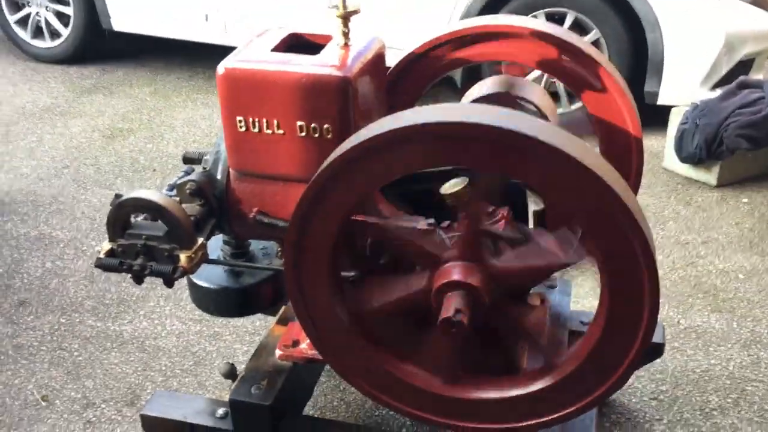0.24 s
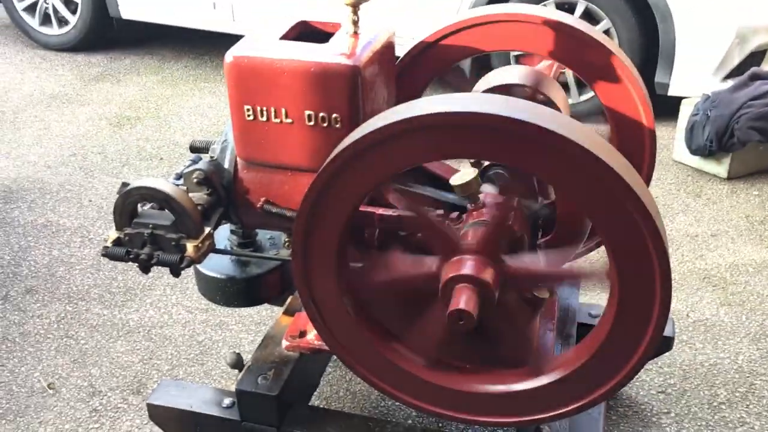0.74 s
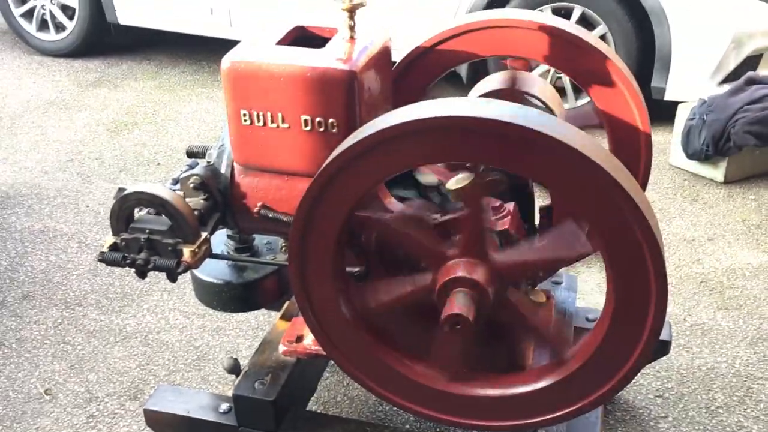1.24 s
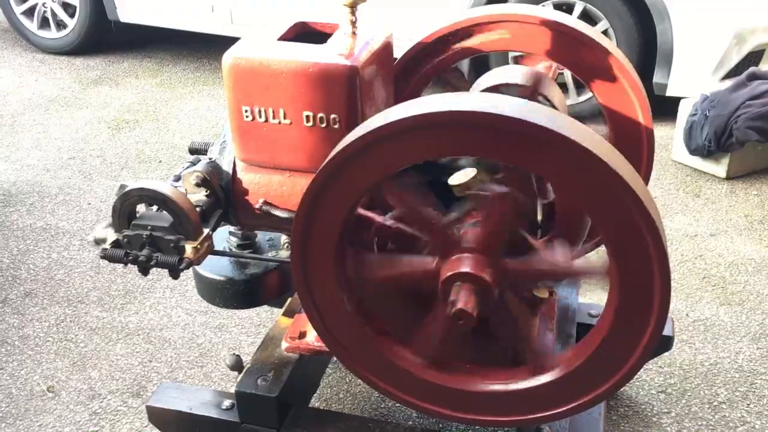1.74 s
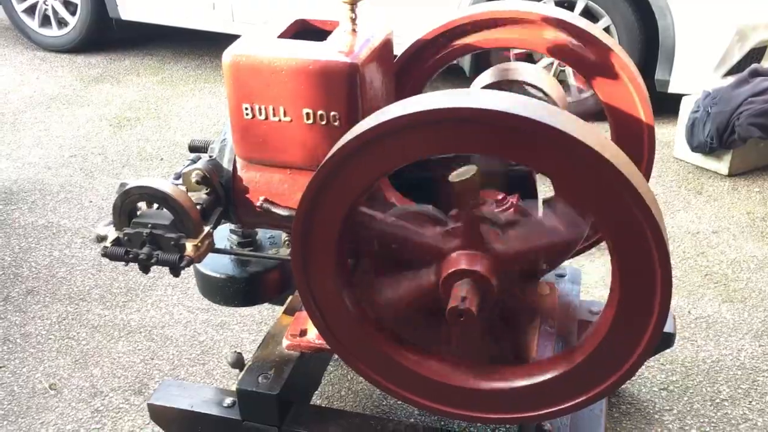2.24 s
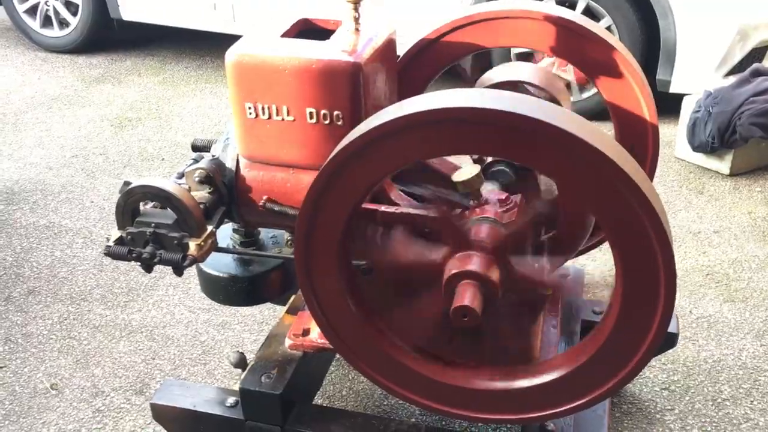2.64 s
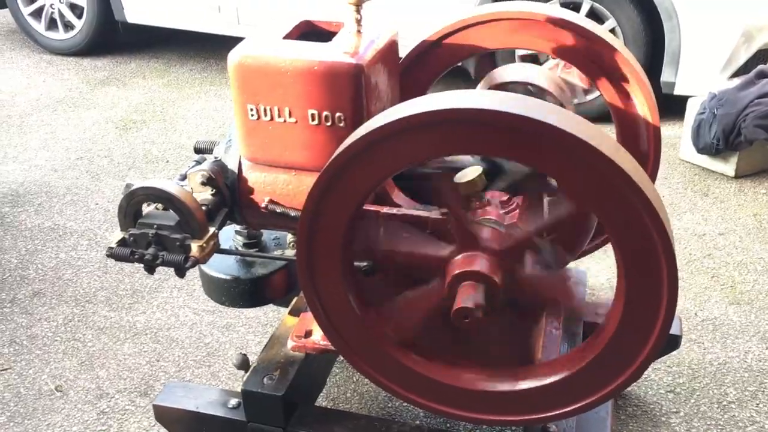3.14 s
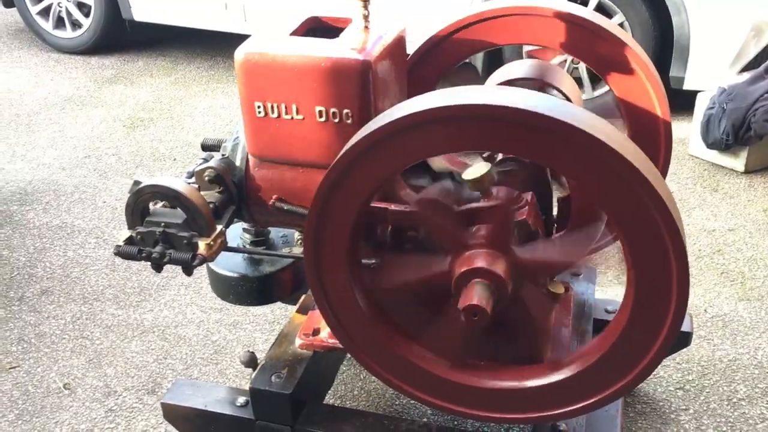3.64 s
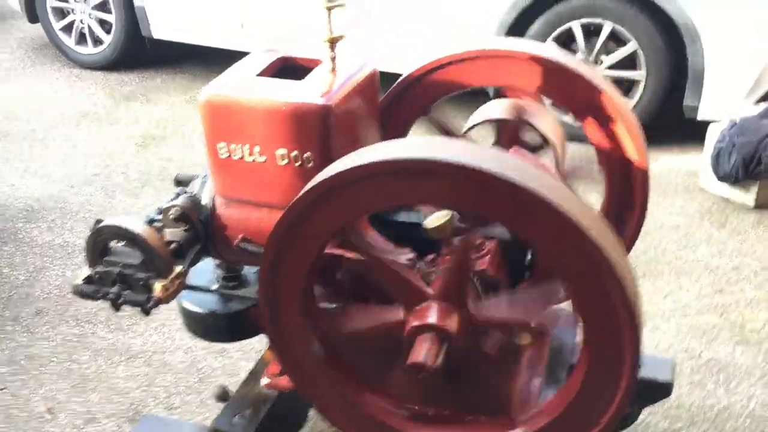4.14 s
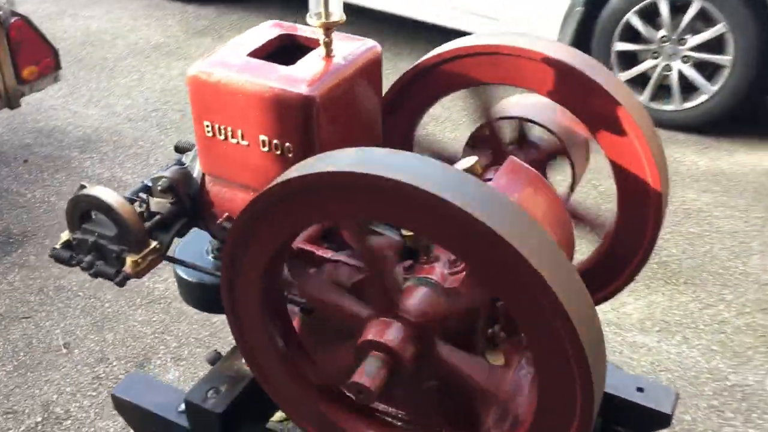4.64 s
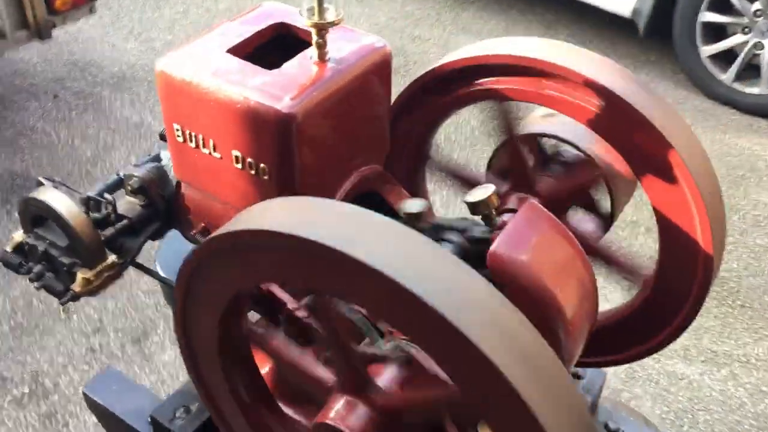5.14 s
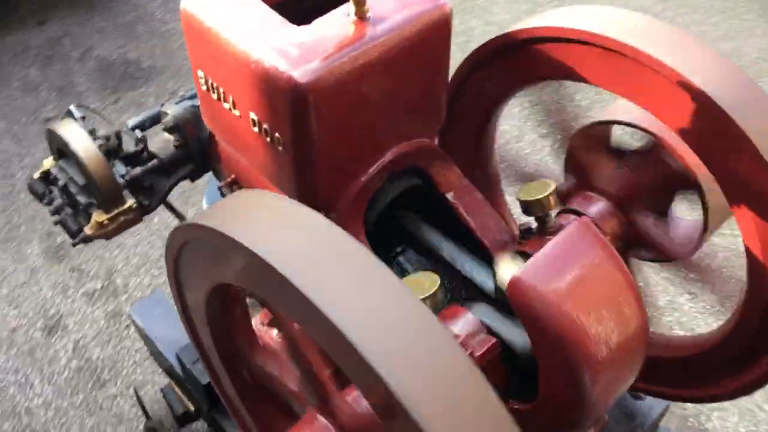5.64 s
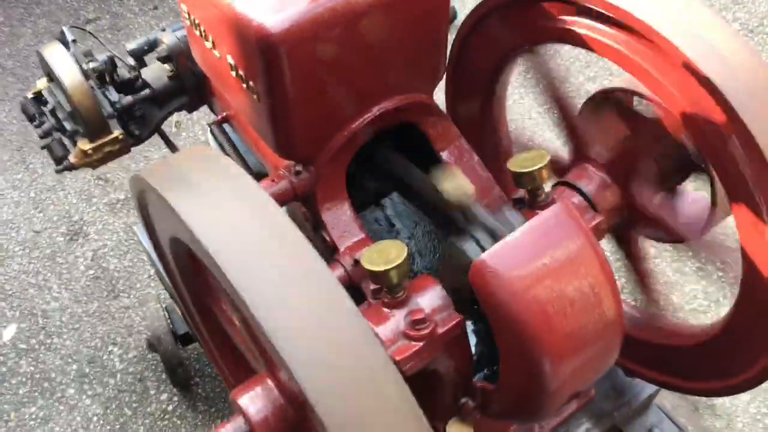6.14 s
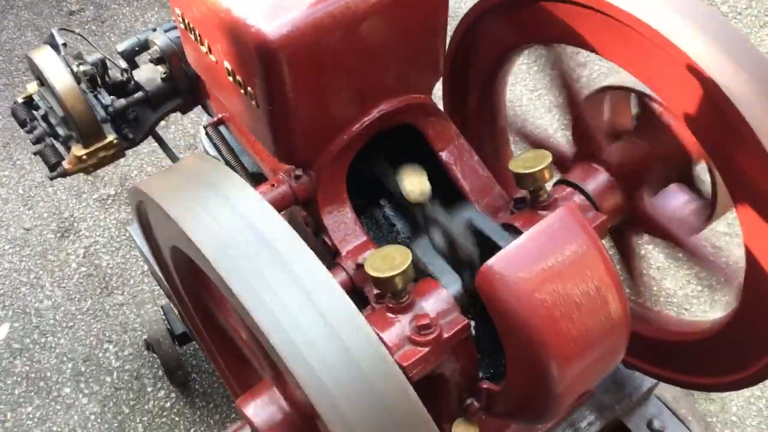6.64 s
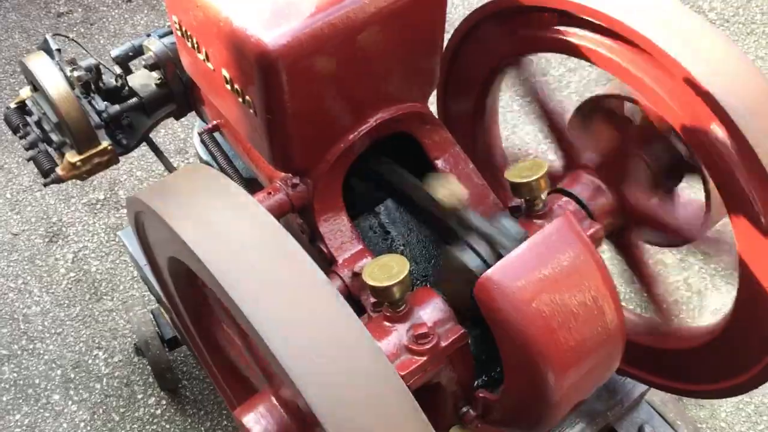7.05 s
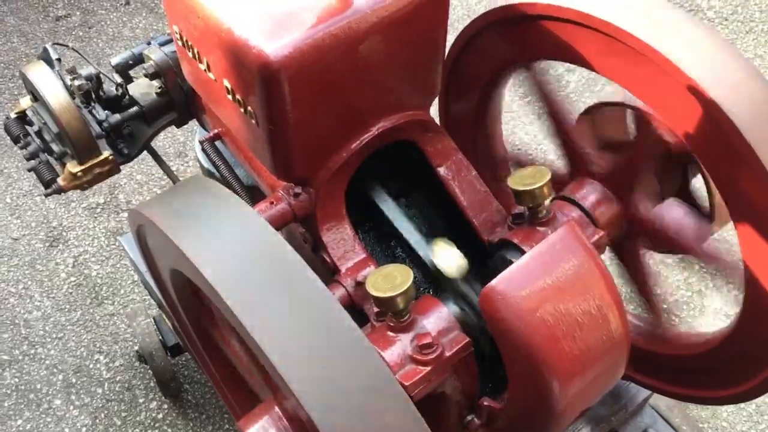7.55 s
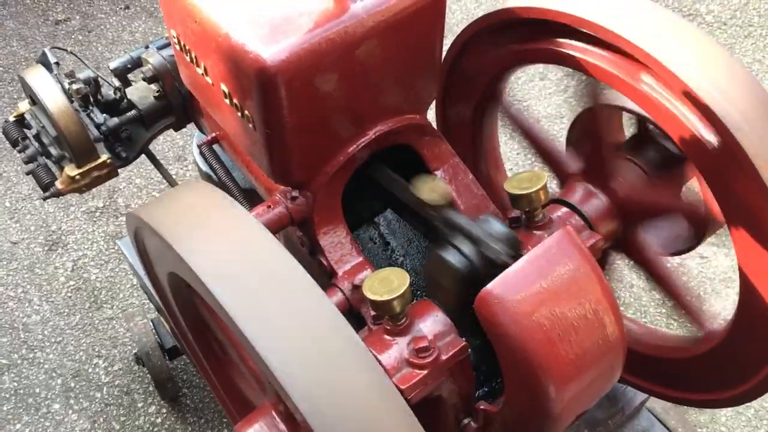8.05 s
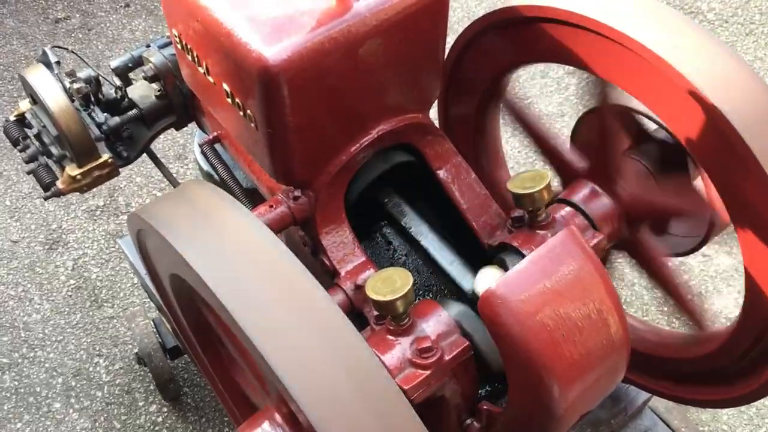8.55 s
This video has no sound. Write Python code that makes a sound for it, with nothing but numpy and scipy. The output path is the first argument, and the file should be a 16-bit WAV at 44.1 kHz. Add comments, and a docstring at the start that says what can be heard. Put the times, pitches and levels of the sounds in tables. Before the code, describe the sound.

An old stationary engine runs outdoors with an even clatter, about three ringing iron knocks a second, mixed with light clicks and rhythmic rubbing. It slows, snorts in air and fires with a hiss and an exhaust bark, then picks up speed. It slows and fires once more, then coasts on. Wind rumbles on the microphone, mostly early, and the engine sounds slightly closer in the second half.

```python
"""Hit-and-miss engine outdoors

A stationary engine coasts at about three turns a second, slowing until it fires, twice. Each turn the
piston rubs and the slack crank knocks the iron frame into ringing; cam and igniter trip click in turn.
A firing is an intake snort, gas hissing past the piston, the igniter's snap and an exhaust bark.
Wind buffets the microphone, which moves in close over the crank halfway through."""
import sys
import numpy as np
from scipy import signal
from scipy.fft import rfft, irfft, next_fast_len
from scipy.io import wavfile
from scipy.ndimage import uniform_filter1d, map_coordinates

SR = 44100
rng = np.random.default_rng(int(sys.argv[2]) if len(sys.argv) > 2 else 0)


def output_pcm(signal):
    """Save a mono or channel-first signal as 16-bit PCM at the path in sys.argv[1].

    Samples are clipped to [-1, 1] before scaling.
    """
    pcm = np.clip(np.atleast_2d(signal).T, -1, 1) * 32767
    wavfile.write(sys.argv[1], SR, np.round(pcm).astype(np.int16))


N = 388080
TIME = np.arange(N) / SR
USUAL_TURN_S = 0.34
COAST_MIN_S, COAST_MAX_S = 0.25, 0.5  # a power turn is shorter, a compression turn longer

# the knock that ends each turn: start_s, level_db, hardness_db, valve_gear_db
CRANK_KNOCKS = [(0.2075, -5, 8, 1), (0.5596, -11.5, 7, 0), (0.9369, -6.5, 5, 0.5), (1.3209, -12.5, 7.5, -6),
                (1.7432, -12.5, 11, -1), (2.332, -2, -2, 0), (2.5205, -3, 4, 0), (2.801, -2.5, 4.5, -2),
                (3.0984, 0, 3.5, 4.5), (3.4001, -5, 5, 2.5), (3.7218, -1.5, 3, 4), (4.0454, -9, 2.5, -1),
                (4.3959, -5.5, 7, -0.5), (4.7487, -11.5, 5, -1), (5.1357, -14.5, 8.5, 2),
                (5.671, -6, 5.5, 0), (5.854, -3.5, 4.5, 0), (6.13, -5, 8, 0.5), (6.4222, -3, 8, 2),
                (6.7153, -6, 5, 1), (7.0292, -2.5, 4.5, 0.5), (7.346, -8, 5.5, 1.5), (7.6861, -5.5, 8, 2.5),
                (8.0316, -13, 6.5, 0.5), (8.4016, -7.5, 11, -0.5), (8.7789, -15.5, 8.5, 0.5)]
# firings: intake_opens_s, intake_shuts_s, air_db, flutter_db, pressure_peak_s, leak_db,
# exhaust_opens_s, spurt_hz, bark_db
FIRING_CYCLES = [(1.85, 1.998, -25.5, -39, 2.279, -9.5, 2.439, 217.8, -12),
                 (5.235, 5.368, -23, -22.5, 5.64, -7.5, 5.776, 191, -10)]
# modes of frame and flywheels, light steel parts, loose iron parts: pitch_hz, level_db, t60_s
FRAME_MODES = [(1060, -31.5, 0.15), (1258, -15, 0.34), (1407, -17, .2), (1459, -8, 0.11),
               (1780, -13.5, 0.19), (2320, 1.5, .17), (2380, -10.5, 0.24), (2483, -8, 0.11),
               (2640, -10, 0.14), (2726, 5, 0.12), (2740, -2, 0.044), (2992, 4, 0.092), (3210, -9.5, 0.17),
               (3417, -10, 0.16), (3535, -9.5, 0.18), (3720, -34, .09), (3780, -3.5, 0.088),
               (4170, -7, 0.073), (4360, -10, 0.078), (4680, -10, 0.11), (4600, -32, .17),
               (5230, -7.5, .13), (5900, -12, 0.079), (5590, -19, 0.11), (6050, -49, .15)]
STEEL_MODES = [(4540, -9, 0.15), (5795, 1.5, 0.038), (6550, -6, .07), (7290, -4, 0.087),
               (8330, -7.5, 0.052), (8920, 6.5, 0.014), (9650, 0, 0.04), (10290, -0.5, 0.042),
               (11650, -2.5, 0.047), (12260, -3.5, 0.067), (13600, -5, 0.046), (14100, -4, 0.059)]
LOOSE_MODES = [(664, -8.5, 0.1), (905, -5.5, 0.062), (1144, -12.5, .09), (1261, -2.5, 0.2),
               (1378, -6.5, 0.061), (1473, -1, 0.07), (1680, 1.5, 0.045), (1810, 1.5, 0.061),
               (1947, 2.5, .06), (2193, -0.5, .06), (2110, -7, 0.07), (2536, 5.5, 0.075),
               (2770, -3.5, 0.07), (2997, 2, 0.035), (3416, -5, .06), (3940, -1.5, 0.05)]
# microphone's approach to the crank: time_s, closeness (0 to 1)
MIC_PATH = [(0, 0.07), (4.6, 0), (6, 1), (8.8, 0.91)]


def amp(db):
    """Decibels to amplitude ratio."""
    return 10 ** (np.asarray(db) / 20)


def unit(x):
    """Normalisation to rms 1."""
    return x / np.sqrt(np.mean(x ** 2))


def add(out, start_s, x):
    """Superposition of x on out from start_s."""
    i = int(start_s * SR)
    x, i = x[max(-i, 0):], max(i, 0)
    out[i:i + len(x)] += x[:max(len(out) - i, 0)]


def decay(t, t60):
    """Exponential damping by 60 dB in t60."""
    return np.exp(-np.log(1000) * t / t60)


def swell(x, start, end, rise_db, fall_db):
    """Exponential attack and release around a hold from start to end; slopes in dB per unit of x."""
    return amp(-rise_db * np.maximum(start - x, 0) - fall_db * np.maximum(x - end, 0))


def walk(rate_hz):
    """Smooth random fluctuation, rms 1."""
    step = int(SR / rate_hz)
    return unit(uniform_filter1d(np.repeat(rng.standard_normal(N // step + 1), step), step)[:N])


def grit(rate_hz, rough_db):
    """Random amplitude modulation breaks noise into grains."""
    return unit(rng.standard_normal(N) * amp(rough_db * walk(rate_hz)))


def colour(x, spectrum):
    """Minimum-phase filter along (frequency_hz, level_db) points; white noise keeps its power."""
    size = next_fast_len(len(x))
    hz, db = np.transpose(spectrum)
    log_hz = np.log(np.fft.rfftfreq(size, 1 / SR) + 1)
    gain = unit(amp(np.interp(log_hz, np.log(hz), db)))
    cepstrum = irfft(np.log(gain), size)
    cepstrum[1:size // 2] *= 2
    cepstrum[size // 2:] = 0
    return irfft(rfft(x, size) * np.exp(rfft(cepstrum)), size)[:len(x)]


def resonate(x, hz, width_hz):
    """Two like resonators in cascade, each width_hz wide, with gain 1 at the centre."""
    b, a = signal.iirpeak(hz, hz / width_hz, fs=SR)
    return signal.lfilter(b, a, signal.lfilter(b, a, x))


def hum(hz, width_hz):
    """A resonance excited by noise, rms 1."""
    return unit(resonate(rng.standard_normal(N), hz, width_hz))


def metal(force, modes):
    """Forced vibration: the force is convolved with a body's damped modes."""
    t = TIME[:SR // 2]
    response = sum((-1) ** k * amp(db) * np.sin(2 * np.pi * hz * t) * decay(t, t60)
                   for k, (hz, db, t60) in enumerate(modes))
    return signal.fftconvolve(force, response / np.linalg.norm(response))[:len(force)]


def turns():
    """End time and period of each rotation, in seconds."""
    ends = np.array(CRANK_KNOCKS)[:, 0]
    periods = np.diff(ends)
    return ends, np.r_[periods[0], periods]


def crank():
    """Rotation: angle in turns, zero at the knock, and speed in doublings over the usual."""
    ends, periods = turns()
    marks = np.r_[ends[0] - periods[0], ends, ends[-1] + periods[-1]]
    count = np.interp(TIME, marks, np.arange(len(marks)))
    angle = (count + 1 / 3) % 1 - 1 / 3  # wraps in the quiet part of the turn
    return angle, np.interp(TIME, ends, np.log2(USUAL_TURN_S / periods))


def outdoor_floor(level_db=-51):
    """Ambient noise, steady and strongest in the bass."""
    # outdoor background: frequency_hz, level_db
    spectrum = [(24, -20.5), (40, 6.5), (90, -8), (200, -7.5), (330, -8), (800, -16.5), (1300, -17.5),
                (2300, -22), (4900, -27.5), (7400, -27), (16000, -28)]
    return amp(level_db) * unit(colour(rng.standard_normal(N), spectrum))


def yard_echoes(x, wet_db=-22, t60=0.26, delay_s=0.012):
    """Reflection from paving, a parked car and walls gives a faint, dull tail."""
    t = TIME[:SR // 2]
    tail = rng.standard_normal(len(t)) * decay(t, t60) * (t > delay_s)
    tail = colour(tail, [(300, 15.5), (2800, 3), (6000, -1.5), (16000, -12)])
    return amp(wet_db) * signal.fftconvolve(x, tail / np.linalg.norm(tail))[:N]


def wind(buffet_db=3.5, strong_db=-28, flap_db=-10, flap_power=1.48):
    """Turbulence rumbles on the microphone; the strongest gusts tear into brighter flaps."""
    # eddy pressure: frequency_hz, level_db
    spectrum = [(20, -58.5), (30, -25), (42, -1.5), (65, 3.5), (120, -5.5), (220, -14), (400, -26.5),
                (900, -40.5), (3000, -66)]
    # gust strength: time_s, level_db
    gusts = [(0, -36), (0.15, -31.5), (0.6, -42.5), (0.8, -34), (1.25, -41.5), (1.5, -39.5), (1.82, -27),
             (2.19, -25.5), (2.27, -43), (2.36, -24.5), (2.65, -33), (3.15, -38), (3.28, -57),
             (3.72, -33.5), (3.9, -54), (4.15, -38), (4.7, -40.5), (5.1, -48), (5.8, -40.5), (6.15, -57),
             (6.63, -37.5), (6.9, -58), (7.7, -53), (8.5, -59), (8.8, -43)]
    eddies = colour(grit(40, rough_db=2.8), spectrum)
    gust_db = np.interp(TIME, *np.transpose(gusts)) + buffet_db * walk(11)
    flaps = colour(grit(45, rough_db=4.5), [(40, -20), (150, 0.5), (300, -4), (600, -15), (2000, -51)])
    flap_gain = amp(flap_db + strong_db + flap_power * (gust_db - strong_db))
    return amp(gust_db) * eddies + flap_gain * flaps


def thumps():
    """Short, low tone bursts are heard as hollow bumps."""
    # bumps: start_s, pitch_hz, level_db, length_s
    bumps = [(0.288, 166, -23.5, 0.023), (1.227, 112.6, -14.5, 0.036), (1.818, 173, -17.5, 0.028),
             (1.824, 430, -21.5, 0.0086), (1.977, 200, -22, 0.012), (2.128, 90, -18.5, 0.067),
             (2.14, 257, -10, 0.0091), (2.142, 580, -20, 0.0052), (2.323, 134, -14.5, 0.018),
             (2.375, 141, -12.5, 0.011), (2.461, 343, -19.5, 0.053), (2.626, 143, -12, 0.018),
             (2.723, 322, -20.5, 0.0086), (5.202, 302, -17.5, 0.042), (5.477, 330, -21, .014),
             (5.485, 389, -30.5, 0.057)]
    out = np.zeros(N)
    for start_s, hz, db, length_s in bumps:
        t = TIME[:int(length_s * SR)]
        add(out, start_s, amp(db) * np.hanning(len(t)) * np.sin(2 * np.pi * (hz * t + rng.random())))
    return out


def bearings(whirr_db=-54, close_db=4, swing_db=3.5, heaviest_turns=0.27):
    """Friction keeps the flywheel bearings whirring, modulated by the load of each turn."""
    # bearing resonances: pitch_hz, width_hz, level_db
    resonances = [(285, 77, 10.5), (987, 83, 3.5), (1288, 70, 1.5), (2333, 56, 0.5), (2390, 140, 4.5),
                  (2740, 190, -6), (4560, 130, -22), (5920, 200, -20.5)]
    angle, _ = crank()
    load_db = swing_db * np.cos(2 * np.pi * (angle - heaviest_turns))
    closeness = np.interp(TIME, *np.transpose(MIC_PATH))
    whirr = sum(amp(db + 1.1 * walk(20)) * hum(hz, width) for hz, width, db in resonances)
    return amp(whirr_db + load_db + close_db * closeness) * unit(whirr)


def cam_squeak(level_db=-44):
    """Friction excites narrow resonances as the cam rubs up its ramp ahead of each knock."""
    # tones of the sliding gear: pitch_hz, width_hz, level_db
    tones = [(2430, 34, -0.5), (3130, 110, -7.5), (4580, 70, -9.5), (7700, 200, -11.5), (9450, 250, -8.5),
             (12940, 400, -12)]
    angle, _ = crank()
    ramp = swell(angle, start=-0.18, end=-0.18, rise_db=303, fall_db=203.5)
    return amp(level_db) * ramp * unit(sum(amp(db) * hum(hz, width) for hz, width, db in tones))


def piston(slide_db=-31, scrape_db=-45, slide_db_per_doubling=5, scrape_db_per_doubling=6):
    """Sliding friction of piston and gears drives the metal, hard into the knock, lightly back."""
    # friction of the low slide and the bright scrape, both loudest just before the knock:
    # frequency_hz, level_db
    slide_spectrum = [(120, -18.5), (200, 0.5), (387, 2.5), (836, -8.5), (1020, -1.5), (1560, -11),
                      (2170, -4), (2420, 3), (3830, -21.5), (4600, -23), (4860, -21), (6050, -23.5),
                      (6880, -15), (9580, -32.5), (16000, -22)]
    scrape_spectrum = [(200, -6.5), (700, -2), (1000, -1.5), (1900, -12.5), (2450, 6), (3300, -16.5),
                       (5000, -28.5), (7400, -10.5), (9500, -7.5), (11000, -28), (13000, -5.5),
                       (16000, -32)]
    # cast iron crankcase resonances: pitch_hz, width_hz, level_db
    case_resonances = [(389.6, 45, 2), (571, 75, -5), (699, 137, -4.5), (1013.5, 43, -3.5)]
    angle, speed = crank()
    slide_swell = swell(angle, start=-0.12, end=0.025, rise_db=141, fall_db=159)
    scrape_swell = swell(angle, start=-0.088, end=0.005, rise_db=184, fall_db=327.5)
    homeward = swell(angle, start=0.21, end=0.48, rise_db=295, fall_db=88.5)
    slide_gain = amp(slide_db_per_doubling * speed) * (slide_swell + amp(-24) * homeward)
    scrape_gain = amp(scrape_db_per_doubling * speed) * (amp(6) * scrape_swell + amp(-9) * homeward)
    slide = slide_gain * grit(350, rough_db=2.5)
    scrape = scrape_gain * grit(200, rough_db=3)
    rub = amp(slide_db) * colour(slide, slide_spectrum) + amp(scrape_db) * colour(scrape, scrape_spectrum)
    ring = amp(-42) * metal(slide, LOOSE_MODES)
    ring += amp(-46) * metal(scrape, FRAME_MODES) + amp(-48) * metal(scrape, STEEL_MODES)
    # the open crankcase throbs from close by; its casting is heard best from the side
    throb = amp(-32) * hum(200, 110) + amp(-38.5) * hum(1023.5, 40)
    casting = amp(-38) * sum(amp(db) * hum(hz, width) for hz, width, db in case_resonances)
    closeness = np.interp(TIME, *np.transpose(MIC_PATH))
    return rub + ring + slide_gain * (closeness * throb + (1 - 0.5 * closeness) * casting)


def clanks(contact_t60=0.021, noise_db=-8, bounce_db=-6, bounce_s=0.014):
    """Impact and two rebounds ring loose iron parts, mostly under the load of a firing."""
    # collisions: start_s, level_db
    impacts = [(.693, -31), (1.449, -24), (1.74, -14), (1.998, -16), (2.045, -20.5), (2.1, -25),
               (2.332, -12.5), (4.898, -30), (5.137, -11.5), (5.369, -19.5), (5.415, -22), (5.463, -25),
               (5.531, -20.5), (5.585, -13.5), (5.668, -5.5), (6.004, -28.5), (6.871, -35)]
    force, t = np.zeros(N), TIME[:SR // 10]
    for start_s, db in impacts:
        gap_s = bounce_s * rng.uniform(0.7, 1.2)
        for k in range(3):
            contact = decay(t, contact_t60) * rng.standard_normal(len(t))
            add(force, start_s + k * gap_s, amp(db + k * bounce_db) * contact)
    clatter = colour(force, [(300, -7), (1500, 2), (3000, -3.5), (6000, -10.5), (16000, -30)])
    return metal(force, LOOSE_MODES) + amp(noise_db) * clatter


def gear_clicks(lead_power=1.25, latch_turns=0.245):
    """Half-speed gearing alternates cam and trip while coasting: (start_s, level_db, treble_db) rows."""
    # push rod, latch and rebounds on one turn, igniter trip on the other, at the usual speed:
    # lead_s, level_db, treble_db, db_per_doubling
    cam_clicks = [(0.076, -20.5, -24, 1.5), (0.0532, -10.5, -4, 28), (0.041, -11.5, -2.5, 17.5),
                  (0.0225, -22, 1, -12.5)]
    trip_clicks = [(0.037, -18, -6, 17.6)]
    clicks = []
    for k, (end_s, period_s) in enumerate(zip(*turns())):
        if COAST_MIN_S < period_s < COAST_MAX_S:
            speed = USUAL_TURN_S / period_s
            doublings = np.log2(speed)
            gear_db = CRANK_KNOCKS[k][3]
            for lead_s, db, treble_db, db_per_doubling in trip_clicks if k % 2 else cam_clicks:
                start_s = end_s - lead_s / speed ** lead_power
                level_db = db + gear_db + db_per_doubling * doublings
                clicks.append((start_s, level_db, treble_db + 7 * doublings))
            latch_reset_s = end_s - (1 - latch_turns) * period_s
            clicks.append((latch_reset_s, -33 + 12 * doublings, 9))
    return clicks


def valve_gear(click_db=-8, click_t60=0.022, rattle_db=-19, rattle_t60=0.21):
    """Impacts of light steel parts snap and rattle, exciting their own modes and the frame's."""
    # igniter and valves during a firing: start_s, level_db, treble_db
    snaps = [(1.8488, -15.5, 8.5), (2.2362, -2, 2), (2.4884, -6.5, 12), (5.3662, -18, 10.5),
             (5.583, -1, 9.5), (5.6007, -6, 9), (5.824, -8.5, 2)]
    # contact noise: frequency_hz, level_db
    spectrum = [(150, -8.5), (400, 3.5), (800, -2.5), (1600, 0), (2000, 0.5), (2600, 1.5), (4000, -1),
                (4900, -4), (5900, 7.5), (7500, -3), (12000, -16), (16000, -8)]
    force, t = np.zeros(N), TIME[:SR // 8]
    envelope = decay(t, click_t60) + amp(rattle_db) * decay(t, rattle_t60)
    for start_s, db, treble_db in gear_clicks() + snaps:
        click = colour(envelope * rng.standard_normal(len(t)), [(2500, 0), (9000, treble_db)])
        add(force, start_s, amp(db + click_db) * click)
    ring = amp(-9) * metal(force, FRAME_MODES) + amp(-4) * metal(force, STEEL_MODES)
    return colour(force, spectrum) + ring


def intake(air_db=2, sag_db_per_s=55, seat_db=-27, flutter_hz=102, slowing_per_s=1.2, crest_s=0.057):
    """Turbulent air rasps past a sprung valve, whose flutter slows as the suction fades."""
    # snort of air: frequency_hz, level_db
    spectrum = [(290, -25.5), (500, -18), (1130, -6.5), (1380, -9), (2360, -1), (2850, -3), (4870, -7.5),
                (5630, -6), (10400, -13.5), (14500, -11.5), (16000, -15)]
    flow, flutter, t = np.zeros(N), np.zeros(N), TIME[:int(0.38 * SR)]
    puff = (t / crest_s * np.exp(1 - t / crest_s)) ** 2
    throat = signal.butter(4, [35, 320], "bandpass", fs=SR, output="sos")
    for opens_s, shuts_s, db, flutter_db, *_ in FIRING_CYCLES:
        suction = amp(db - sag_db_per_s * np.maximum(TIME - opens_s, 0))
        flow += suction * swell(TIME, opens_s, shuts_s - 0.043, rise_db=1400, fall_db=300)
        flow += amp(seat_db) * swell(TIME, shuts_s, shuts_s, rise_db=1500, fall_db=650)  # spit on seating
        rate_hz = flutter_hz * np.exp(-slowing_per_s * t) * (1 + 0.08 * walk(120)[:len(t)])
        phase = np.cumsum(rate_hz) / SR
        pulses = np.exp(-(phase % 1) / 0.22) * (1 + 0.96 * np.cos(np.pi * phase))  # strong, then weak
        add(flutter, opens_s - 0.015, amp(flutter_db) * puff * unit(signal.sosfilt(throat, pulses)))
    return amp(air_db) * flow * colour(grit(250, rough_db=3), spectrum) + flutter


def blow_by(whistle_db=-13, squeeze_db=-10, burn_s=0.0071, draught_db=-36, draught_s=0.068):
    """Jets in narrow gaps hiss and half whistle, rising with compression and surging as the gas burns."""
    # leaking gas: frequency_hz, level_db
    spectrum = [(400, -28), (1500, -17.5), (2100, -17.5), (2800, -6), (4300, -14.5), (5800, -8.5),
                (7500, -9.5), (10500, -8), (12300, -1.5), (13700, -5.5), (15300, -4), (16000, -3.5)]
    flow = np.zeros(N)
    draught = amp(draught_db) * np.sqrt(np.hanning(int(draught_s * SR)))
    for opens_s, _, _, _, peak_s, leak_db, *_ in FIRING_CYCLES:
        squeeze = swell(TIME, peak_s, peak_s, rise_db=116, fall_db=163)
        burn = swell(TIME, peak_s - burn_s / 2, peak_s + burn_s / 2, rise_db=700, fall_db=419)
        flow += amp(leak_db) * (burn + amp(squeeze_db) * squeeze)
        add(flow, opens_s - 0.093, draught)  # just ahead of the intake
    whistle = unit(hum(12300, 500) + hum(13930, 300) + hum(15400, 450))
    hiss = colour(flow * grit(400, rough_db=2), spectrum)
    return hiss + amp(whistle_db) * flow ** 0.75 * whistle


def exhaust(breath_gain=1.8, flat_share=0.22, warm_s=0.02):
    """Spurts of spent gas excite the muffler's resonances, which rise as hot gas fills it."""
    # muffler resonances: pitch_hz, width_hz, level_db
    muffler = [(200, 54, 0), (354, 270, 0.5), (600, 340, -11), (1184, 99, -5), (1405, 280, -1.5),
               (1860, 160, -14), (2750, 164, 6), (3150, 330, 1.5), (3520, 130, 2.5), (6000, 1700, -22.5),
               (10000, 1600, -17.5), (14500, 4000, -14.5)]
    out, t = np.zeros(N), TIME[:SR // 5]
    envelope = swell(t, 0.014, 0.03, rise_db=999, fall_db=329.5) * (1 - decay(t, 0.02))
    warped_s = t - flat_share * warm_s * (1 - np.exp(-t / warm_s))  # starts flat, glides up to pitch
    for *_, opens_s, spurt_hz, bark_db in FIRING_CYCLES:
        phase = spurt_hz * t % 1
        spurts = unit(1.0 * (np.diff(phase, prepend=0) < 0))
        breath = unit(rng.standard_normal(len(t)) * np.exp(-phase / 2.9))
        gas = spurts + breath_gain * breath
        bark = sum(amp(db) * resonate(gas, hz, width) for hz, width, db in muffler)
        bark = unit(map_coordinates(bark, [warped_s * SR], order=3))
        add(out, opens_s, amp(bark_db) * envelope * bark)
    return out


def crank_knocks(crack_db=-7, crack_t60=0.028, ring_db=-15, bounce_s=0.018, oil_s=0.001):
    """Impact: slack in the crank closes, chatters and bounces, leaving the frame in free vibration."""
    # contact noise: frequency_hz, level_db
    spectrum = [(200, -14), (900, -29), (2100, -10.5), (2400, -6), (2780, 1.5), (3300, -8), (3600, -5.5),
                (3980, 2), (4400, -5), (5000, -16), (5880, -3.5), (6900, -27.5), (10400, -24), (16000, -40)]
    out, t = np.zeros(N), TIME[:SR // 2]
    hz, mode_db, t60 = np.transpose(FRAME_MODES)[:, :, None]
    chatter = amp(-17) * decay(t, 0.17)
    onset = 1 - np.exp(-t / oil_s)  # the oil film softens the first instant
    # a firing kicks the crank a second time
    kicks = [(end_s + 0.024, -10, 4) for end_s, period_s in zip(*turns()) if period_s > COAST_MAX_S]
    for start_s, db, hardness_db, *_ in CRANK_KNOCKS + kicks:
        scatter, detune, phase = rng.standard_normal((3, len(FRAME_MODES), 1))
        partials = np.sin(2 * np.pi * (hz * (1 + 0.00086 * detune) * t + phase))
        ring = (amp(mode_db + 2 * scatter) * partials * decay(t, t60)).sum(0)
        since_bounce = t - bounce_s * rng.uniform(0.84, 1.3)
        bounce = amp(-19) * decay(abs(since_bounce), crack_t60) * (since_bounce > 0)
        contact = amp(crack_db + hardness_db) * decay(t, crack_t60) + chatter + bounce
        crack = colour(contact * rng.standard_normal(len(t)), spectrum)
        add(out, start_s, amp(db) * onset * (crack + amp(ring_db) * ring))
    return out


def scene():
    """Superposition of the engine, its reflections and the outdoor background, in mono."""
    knocks = crank_knocks()
    fittings = amp(-18.5) * metal(knocks, STEEL_MODES)  # each knock shakes the steel too
    engine = knocks + fittings + valve_gear() + clanks() + piston() + cam_squeak() + bearings()
    engine += intake() + blow_by() + exhaust()
    return (engine + outdoor_floor() + yard_echoes(engine) + wind() + thumps())[None]


def record(dry, cutoff_hz=15800):
    """Soft saturation rounds the highest peaks; a steep low-pass cuts the top."""
    lowpass = signal.ellip(10, 0.2, 80, cutoff_hz, fs=SR, output="sos")
    return signal.sosfilt(lowpass, 1.17 * np.tanh(dry / 1.385))


dry = scene()
out = record(dry)
output_pcm(out)
```